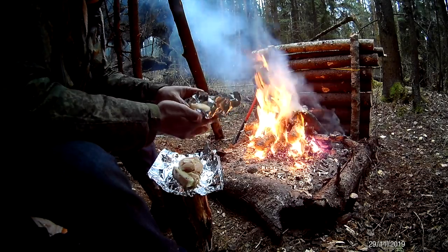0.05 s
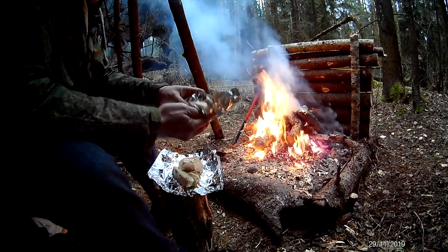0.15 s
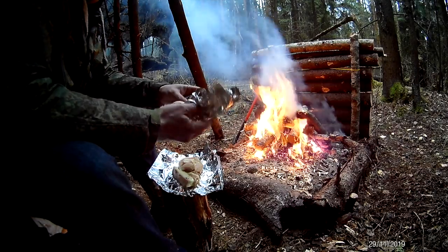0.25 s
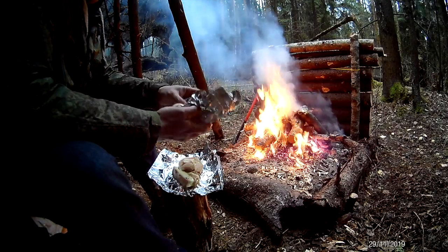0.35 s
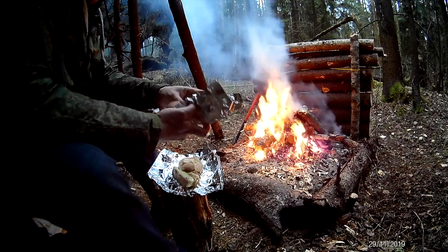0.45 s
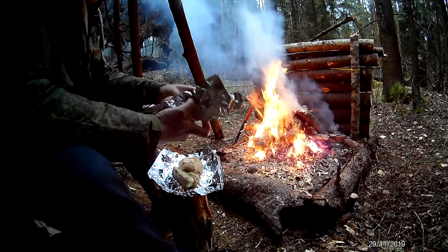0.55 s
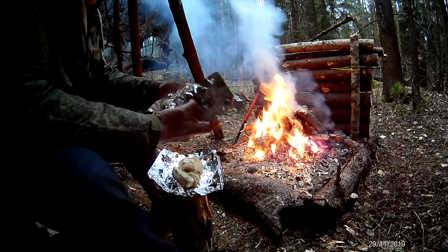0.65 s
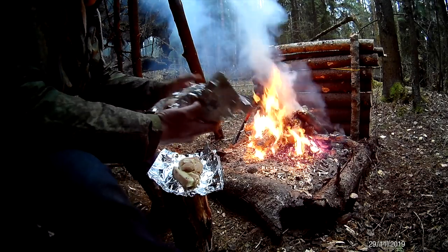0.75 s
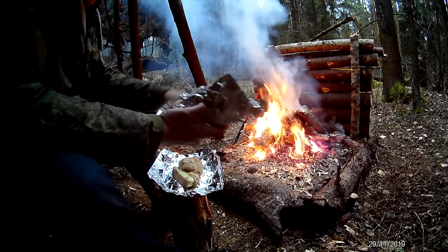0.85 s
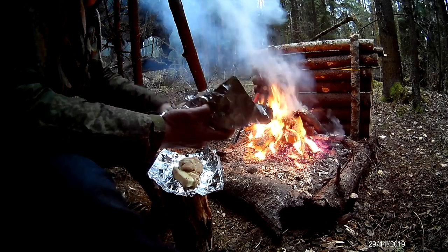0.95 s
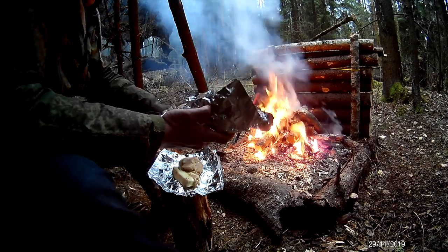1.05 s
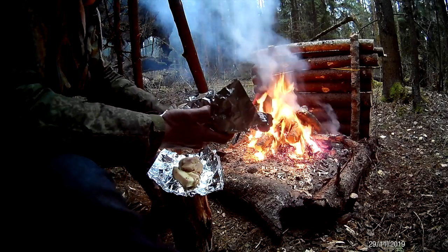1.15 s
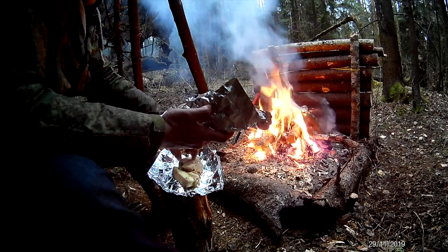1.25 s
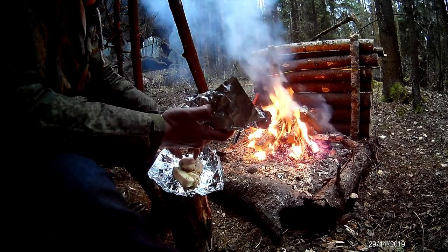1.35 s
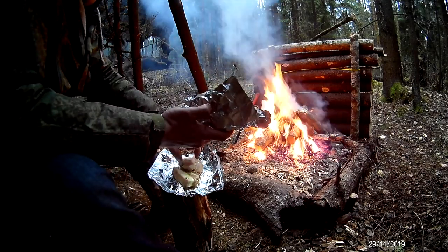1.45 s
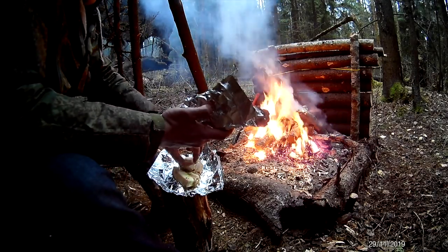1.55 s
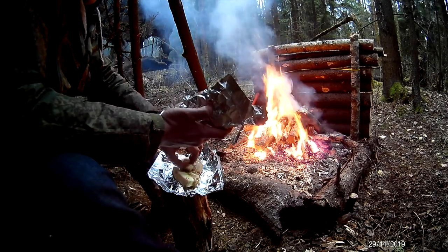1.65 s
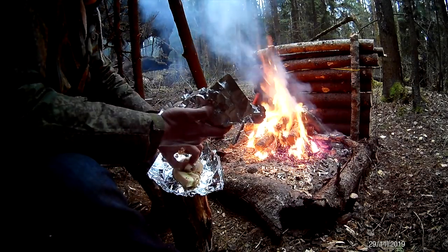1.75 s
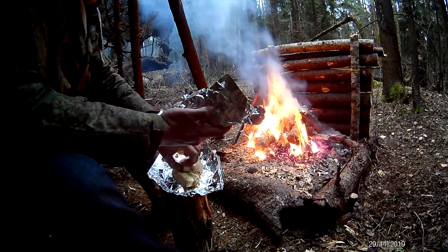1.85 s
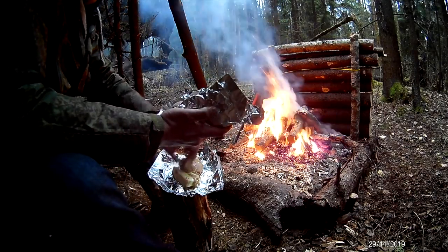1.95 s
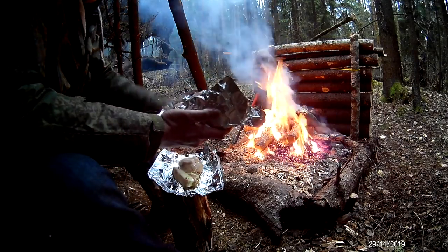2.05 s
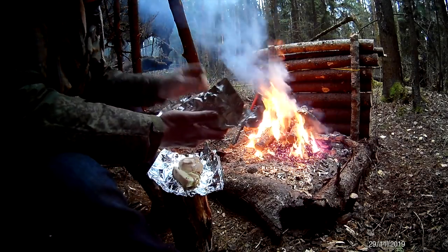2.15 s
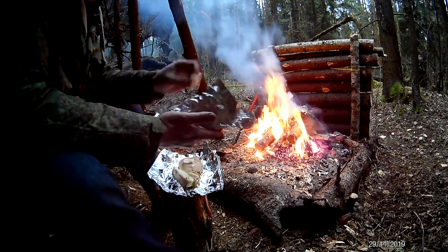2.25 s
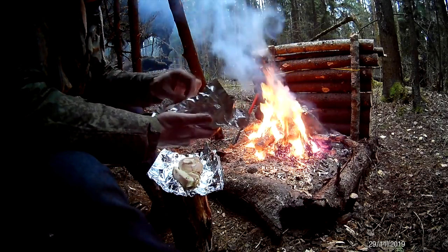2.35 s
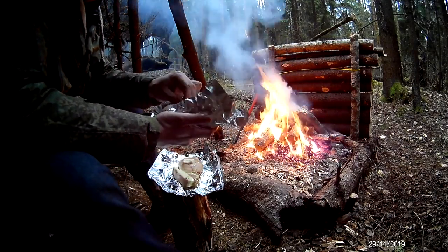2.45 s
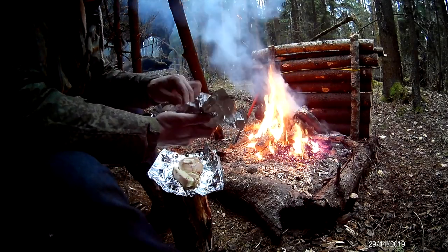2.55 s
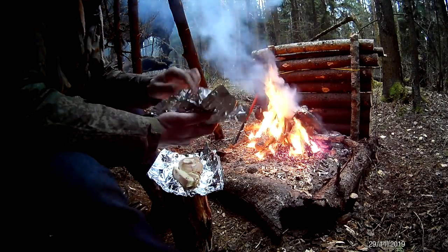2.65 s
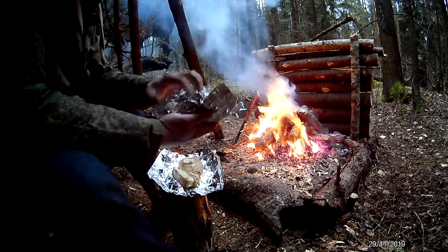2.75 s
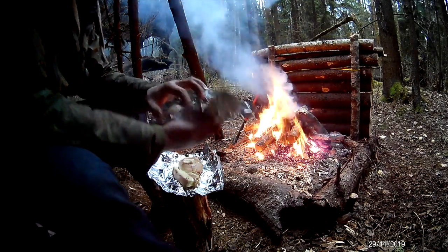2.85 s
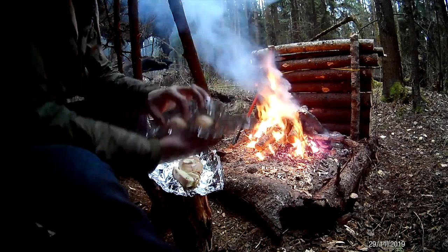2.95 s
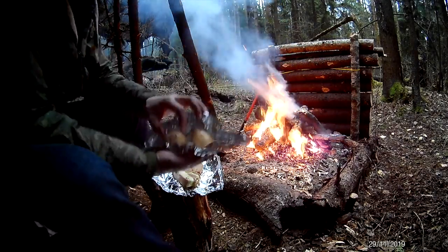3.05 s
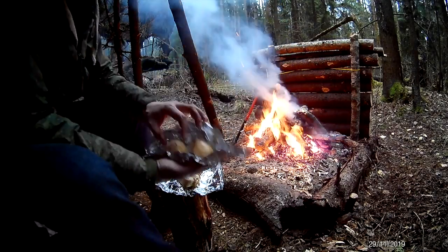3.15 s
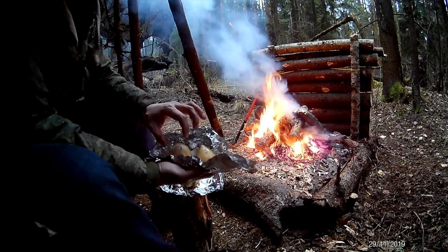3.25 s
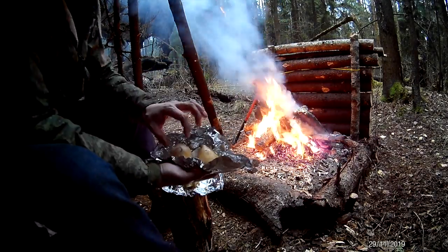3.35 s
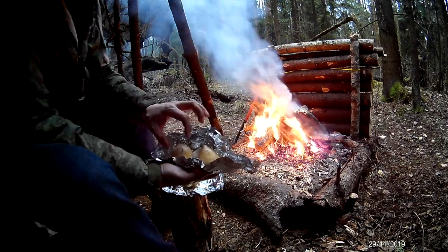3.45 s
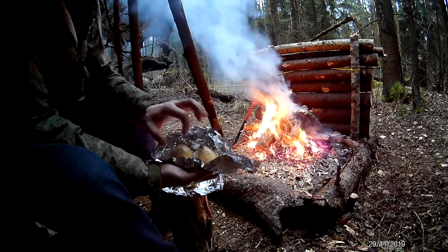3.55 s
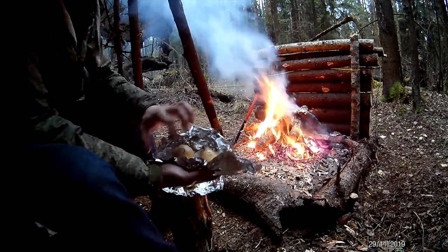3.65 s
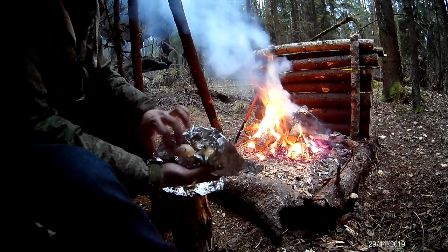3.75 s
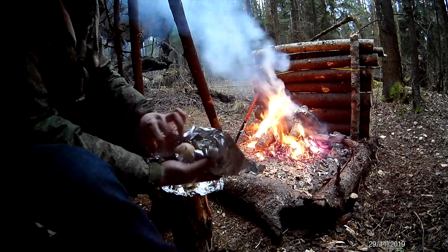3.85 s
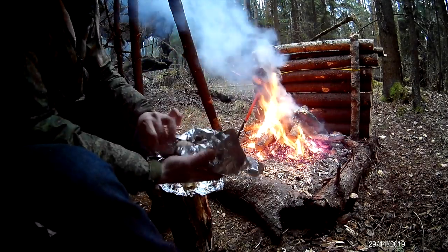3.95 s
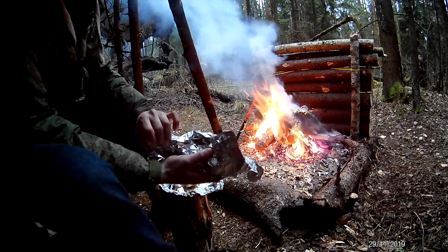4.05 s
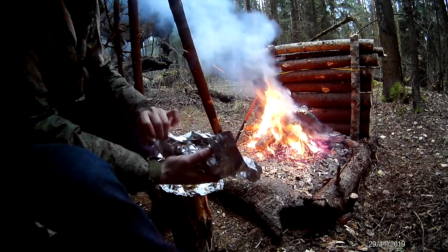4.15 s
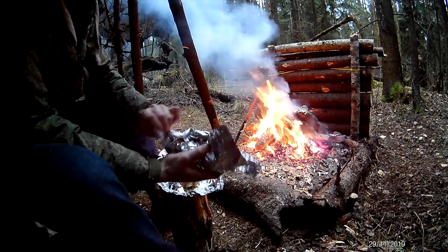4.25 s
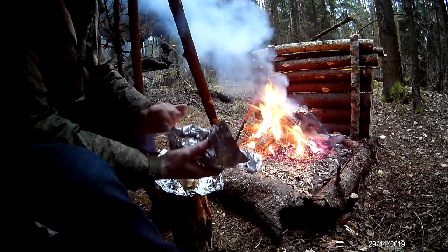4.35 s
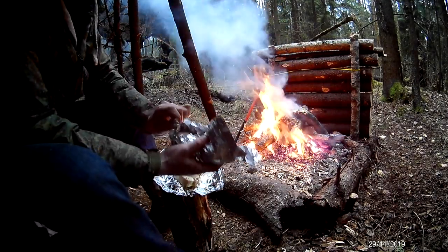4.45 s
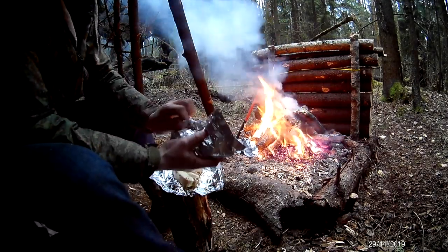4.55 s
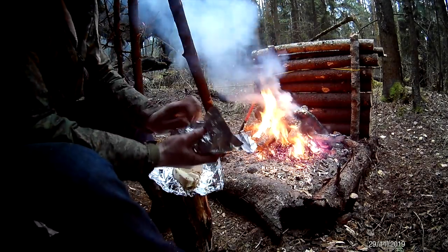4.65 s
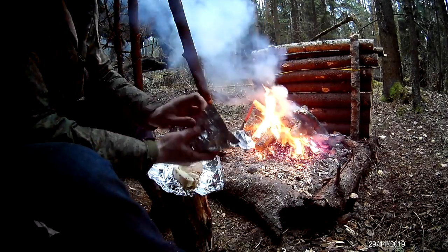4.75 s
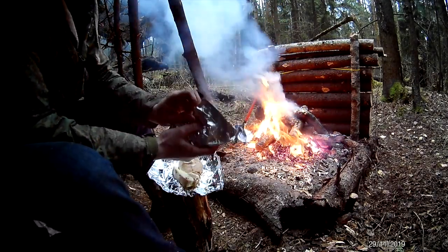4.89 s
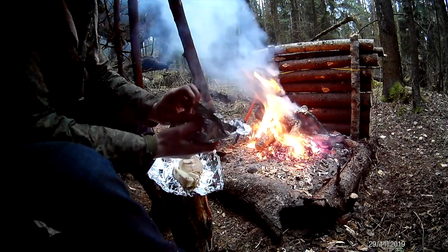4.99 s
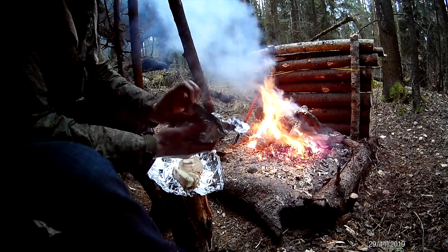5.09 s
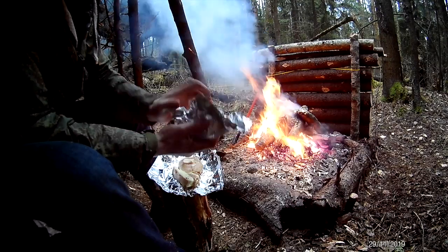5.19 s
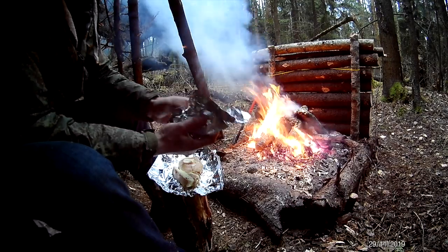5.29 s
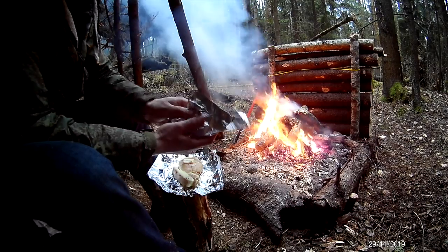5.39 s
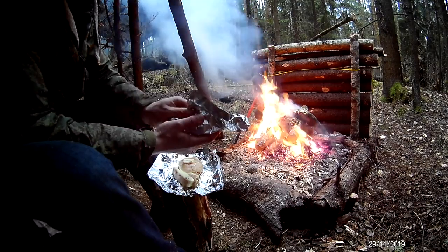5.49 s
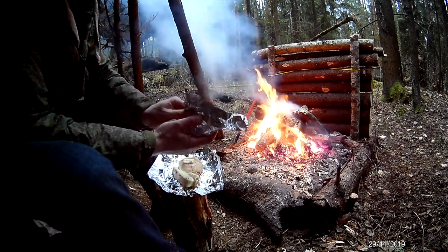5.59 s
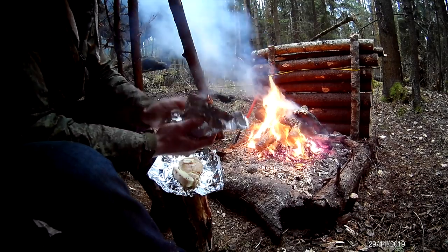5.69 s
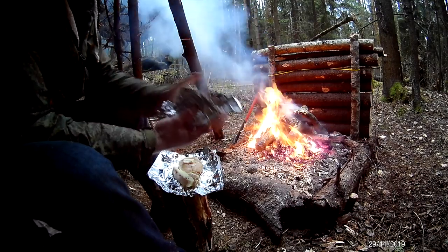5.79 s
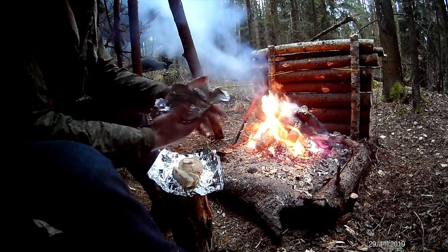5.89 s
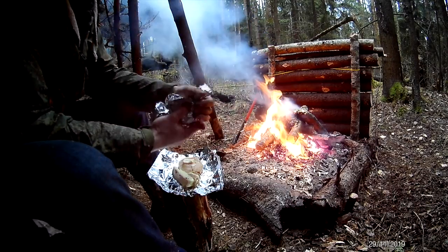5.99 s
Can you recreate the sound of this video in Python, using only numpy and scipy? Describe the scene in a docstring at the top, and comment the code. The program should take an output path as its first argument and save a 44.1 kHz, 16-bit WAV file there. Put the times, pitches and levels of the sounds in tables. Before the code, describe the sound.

Hands crumple an aluminium foil parcel close to a small camera by a forest campfire. Short crinkles and snaps come first, then a lull with two small sap pops. Squeezing resumes sparsely, then turns into dense, louder crackle with hollow little thumps. A low, soft fire roar flutters underneath, with faint hiss. The sound is boxy and slightly muffled by the camera housing.

```python
"""Hands crumple an aluminium foil parcel by a forest campfire, heard by a small camera through its housing.
0-1 s: squeezes; facets buckle in snaps over a swarm of ringing creases. 1-2.4 s: lull, two sap pops.
2.4-3.9 s: squeezes resume, scattered snaps. 3.9-6 s: dense snaps, ticks and crackle.
Throughout: filtered-noise fire roar with random flutter, faint idle crackle, filtered-noise hiss."""
import sys
import numpy as np
from scipy.fft import rfft, irfft, next_fast_len
from scipy.io import wavfile
from scipy.ndimage import map_coordinates

SR = 44100
rng = np.random.default_rng(int(sys.argv[2]) if len(sys.argv) > 2 else 0)


def transcribe(signal):
    """Save signal, clipped to [-1, 1], as a 16-bit WAV file at the path in sys.argv[1]."""
    frames = np.atleast_2d(signal).T
    limited = np.clip(frames, -1, 1)
    pcm = np.round(limited * 32767).astype(np.int16)
    wavfile.write(sys.argv[1], SR, pcm)


N = 265614

# Buckling facets: t/s, relative level/dB, facet pitch f/Hz, relative thump/dB, relative rattle/dB
FACET_SNAPS = [(0.081, -33, 3070, -31, -14.5), (0.148, -38.5, 4180, -21, -16),
               (0.152, -36.5, 3030, -22, -20), (0.305, -45, 1280, -15, -8), (0.3312, -45.5, 4040, -1.5, -8),
               (0.442, -40, 4080, -15, -13), (0.4695, -32.5, 1810, -4, -17), (0.6218, -41, 1616, -36, -23),
               (0.628, -39, 4840, -34, -25), (0.6527, -28.5, 4020, -41, -24), (0.663, -27, 4080, -25, -16),
               (0.6669, -32.5, 1040, 0, -17), (0.6755, -30, 2060, -0.5, -16), (0.678, -30.5, 666, -8, -31),
               (0.6832, -28.5, 4230, -32, -15.5), (0.7283, -38, 2310, -20, -14),
               (0.74, -29.5, 1670, -20, -16), (1.054, -44, 4146, -21, -9.5), (1.856, -49.5, 2430, -29, -14),
               (2.428, -47, 1710, -26, -19), (2.4646, -42, 1320, 3, -31), (2.611, -40.5, 1340, -8, -19),
               (2.7701, -46, 1300, 13, -4.5), (2.7929, -35, 1720, -5.5, -15), (3.0863, -38, 1510, 4, -16),
               (3.2503, -29.5, 2173, -23, -16), (3.546, -44.5, 2050, -26, -23),
               (3.6388, -42.5, 2150, -16, -9.5), (3.9, -39, 1130, -5, -14), (3.936, -35.5, 1020, -6, -18.5),
               (3.9755, -35.5, 1420, -4, -26), (3.9993, -33.5, 1930, -2, -17),
               (4.055, -26.5, 2010, -17, -19), (4.0792, -27.5, 1490, 4, -20.5),
               (4.0973, -33, 1820, -7, -22), (4.144, -28, 2250, -12, -22), (4.1518, -31, 1200, -1.5, -11.5),
               (4.1704, -38, 1290, 8, -25), (4.1919, -31.5, 700, 3.5, -12), (4.2057, -28, 710, -3, -14.5),
               (4.2155, -28.5, 550, -10, -20), (4.2358, -38, 2200, -16, -11), (4.257, -29.5, 2350, -1, -14),
               (4.275, -33, 1820, 5, -37), (4.2916, -33, 1250, -1, -13), (4.3073, -33, 1410, 4, -23),
               (4.319, -26, 2120, -6, -28), (4.3354, -45, 1440, -6, -2), (4.3568, -47, 1610, 10, -24),
               (4.51, -30.5, 2150, -11, -11.5), (4.5158, -31.5, 1340, -2.5, -16),
               (4.5755, -27, 1560, -16, -22), (4.5867, -25, 1510, -5.5, -30),
               (4.6082, -29.5, 1315, -2, -26), (4.6487, -39.5, 2100, 0.5, -3.5),
               (4.7163, -36.5, 1630, 2.5, -9.5), (4.7593, -42, 2140, -21.5, -3.5),
               (4.779, -28, 4150, -14, -31), (4.792, -31, 1390, -12, -16.5), (4.806, -34, 1100, -14, -22),
               (4.8276, -35, 1310, -2, -30), (4.844, -29, 2110, -7, -25), (4.852, -38.5, 1090, 3.5, -7.5),
               (4.9012, -34, 1800, -19, -34), (5.045, -42, 1340, 8.5, -7), (5.047, -27.5, 4710, -21, -36),
               (5.1118, -29.5, 1055, -5.5, -17.5), (5.1703, -34, 1570, -5, -24),
               (5.1855, -30.5, 1260, 7.5, -8.5), (5.19, -31.5, 1310, 0, -18),
               (5.1945, -30, 1670, -4, -13.5), (5.203, -28.5, 2010, -16, -17),
               (5.3691, -36, 1750, -3, -22.5), (5.4049, -30, 1920, 1, -14), (5.453, -39, 1020, 3, -21),
               (5.4867, -29.5, 1910, 2.5, -13.5), (5.5068, -22.5, 2080, 2.5, -22),
               (5.511, -31, 1300, -4, -13), (5.7279, -34.5, 1785, -4, -17), (5.7536, -32, 2050, -7, -14),
               (5.7882, -36.5, 1530, -19, -15), (6.0054, -27, 1770, -1.5, -19.5)]
# Squeezes of the hands: start t/s, hold/s, crackle level before housing/dB,
# tilt toward small bright facets/(dB per octave)
HAND_SQUEEZES = [(0.0, 0.078, -44.5, -1.5), (0.152, 0.033, -46, -3), (0.264, 0.066, -51.5, 2),
                 (0.378, 0.15, -44.5, -2), (0.631, 0.065, -41, -2), (0.745, 0.028, -42, -1),
                 (0.939, 0.019, -47.5, -2), (2.44, 0.047, -56, -3), (2.565, 0.074, -48, -5.5),
                 (2.692, .12, -45, -2), (2.855, 0.26, -43, -4), (3.787, 0.0068, -49.5, -1),
                 (3.835, 0.01, -45, 1), (3.903, 0.096, -47, -2.5), (4.027, 0.065, -34.5, -1),
                 (4.14, 0.06, -36, -1.5), (4.281, 0.088, -39.5, -1), (4.438, 0.085, -42.5, 0),
                 (4.561, 0.083, -37, -0.5), (4.713, 0.035, -38, 0.5), (4.828, 0.076, -38, -1.5),
                 (4.937, 0.094, -45.5, -2), (5.014, .11, -40.5, -1.5), (5.173, 0.043, -36.5, 1.5),
                 (5.284, 0.038, -42, 0), (5.368, 0.073, -38.5, -1.5), (5.475, 0.1, -40, -3.5),
                 (5.558, 0.057, -42.5, 2), (5.703, 0.055, -39, -1), (5.833, 0.08, -45.5, -1),
                 (5.976, .06, -40, -1)]
# Tiny folds ticking: t/s, relative level/dB
FOLD_TICKS = [(0.277, -38), (0.8043, -45), (2.6224, -45), (2.9575, -43), (3.01, -45), (3.1083, -41),
              (3.229, -45), (3.901, -37), (4.0406, -35.5), (4.135, -33), (4.427, -35), (4.4544, -36.5),
              (4.6244, -47), (4.691, -41), (5.3733, -41), (5.6161, -45), (5.6544, -36.5), (5.7174, -54)]
# Sap pockets bursting: t/s, relative level/dB
SAP_POPS = [(1.6393, -30), (1.7254, -40.5)]
# Sound path into the camera: f/Hz, gain/dB
HOUSING_GAIN = [(130, -33), (250, -7.5), (450, -6), (823, -3.5), (2090, -6), (2320, -6.5), (2850, -22.5),
                (3520, -19), (4080, -13), (4500, -17), (5500, -22), (6210, -19.5), (7500, -40), (8000, -48),
                (8550, -29.5), (9150, -27.5), (10500, -31.5), (12400, -30), (13200, -40), (15500, -41)]
# Flame roar spectrum shape: f/Hz, relative level/dB
ROAR_SHAPE = [(12, -19), (22, -6), (50, 2.5), (85, -3), (147, -4), (242, -13.5), (420, -13), (484, -12),
              (915, -12.5), (1330, -14.5), (1560, -28.5), (2300, -36), (2900, -64), (6000, -100)]
# Microphone self-noise spectrum shape: f/Hz, relative level/dB
HISS_SHAPE = [(500, 12), (3000, 3.5), (7500, -3.5), (12000, -4.5), (15800, -1)]

SWELL_AT_0DB_THUMP_S, DAMPING_DB_PER_DB = 0.00099, 0.44  # louder thump: shorter facet ring
PUSH_S = 0.001284  # push centre, after the ring starts
PARCEL_HZ, TIGHTER_HZ_PER_S = 300.4, 33.55  # thump pitch rises as the parcel is crumpled smaller
ATTACK_S, RELEASE_DB_PER_S = 0.015, 252  # squeeze: fast swell, slower relaxation
IDLE_DB, IDLE_TILT_DB_PER_OCT = -61.5, -0.31  # foil merely held
ROAR_RMS_DB, HISS_RMS_DB = -53, -72
TOP_HZ = 15780


def amp(db):
    """dB to gain."""
    return 10 ** (np.asarray(db) / 20)


def unit(x):
    """Scaled to rms 1."""
    return x / np.sqrt(np.mean(x ** 2) + 1e-20)


def wobble(knots_per_s):
    """Smooth random curve through normal knots."""
    knots = rng.standard_normal(int(N * knots_per_s / SR) + 4)
    return map_coordinates(knots, [np.arange(N) * knots_per_s / SR])


def coloured(x, points):
    """x through the causal minimum-phase filter with these (Hz, dB) gains."""
    m = 2 * next_fast_len(N // 2 + 4096)
    f_hz, gain_db = np.transpose(points)
    bins_hz = np.fft.rfftfreq(m, 1 / SR)
    log_gain = np.interp(np.log(bins_hz + 1), np.log(f_hz + 1), gain_db) * np.log(10) / 20
    cepstrum = irfft(log_gain, m)
    # fold onto positive times: minimum phase
    cepstrum[1:m // 2] *= 2
    cepstrum[m // 2 + 1:] = 0
    return irfft(rfft(x, m) * np.exp(rfft(cepstrum)), m)[:N]


def mix(starts, shapes):
    """Sum of short sounds (rows of shapes) beginning at the given samples."""
    where = starts[:, None] + np.arange(shapes.shape[1])
    return np.bincount(where.ravel(), shapes.ravel(), N + shapes.shape[1])[:N]


def facet_ring(t, start_s, hz, thump_db, rattle_db, drift):
    """A buckling facet swells and dies; its overtones go with the rattle."""
    phase = 2 * np.pi * hz * (t - PUSH_S) + drift
    overtones = np.cos(2 * phase) + np.cos(3 * phase)
    tone = np.cos(phase) + amp(rattle_db + 8.5) * overtones
    age = t / (SWELL_AT_0DB_THUMP_S * amp(-DAMPING_DB_PER_DB * thump_db))
    return -.8 * tone * age * np.exp(1 - age)


def parcel_thump(t, start_s, hz, thump_db, rattle_db, drift):
    """The facet's push as a short pulse, plus the whole parcel's decaying low ring."""
    u = (np.pi * .7 * hz * (t - PUSH_S)) ** 2
    push = 2.61 * (2 * u - 1) * np.exp(-u)
    parcel_hz = PARCEL_HZ + TIGHTER_HZ_PER_S * start_s
    body = 0.99 * amp(-60 * t / 0.064) * np.sin(2 * np.pi * parcel_hz * t + 0.53 * drift)
    return amp(thump_db - 6.5) * (push + body)


def facet_rattle(t, start_s, hz, thump_db, rattle_db, drift):
    """Neighbouring small facets: uneven noise and seven random pitches per snap, swelling then dying."""
    small_hz = 2600 * 4.8 ** rng.random((len(start_s), 7))
    chime = sum(np.sqrt(f / 4000) * np.sin(2 * np.pi * f * t + 0.38 * drift)
                for f in small_hz.T[..., None])
    chance = rng.standard_normal((2, len(start_s), len(t)))
    noise = chance[0] * np.exp(0.81 * chance[1])
    t60_s = 0.043 * amp(0.21 * (rattle_db + 11.5))  # weak rattle is also brief
    decay = amp(rattle_db + 13.5 - 60 * t / t60_s)
    return decay * (noise + 0.61 * chime) * (1 - np.exp(-t / 0.0012))


def snaps():
    """Each buckle sums facet ring, parcel thump and rattle, all sharing one phase drift."""
    start_s, db, hz, thump_db, rattle_db = (c[:, None] for c in np.transpose(FACET_SNAPS))
    t = np.arange(SR // 16) / SR
    # phase wanders as the facet changes shape
    drift = np.cumsum(rng.standard_normal((len(start_s), len(t))), 1) * 0.16
    drift = drift - drift[:, [round(PUSH_S * SR)]]  # ring and push dip together
    snap = (t, start_s, hz, thump_db, rattle_db, drift)
    shapes = facet_ring(*snap) + parcel_thump(*snap) + facet_rattle(*snap)
    return mix((start_s[:, 0] * SR).astype(int), amp(db - 2.0) * shapes)


def creases(count=34000):
    """Swarm of tiny creases, each ringing one facet for a few cycles; hard squeezes are more uneven."""
    control_s, gain, tilt = handling()
    draw = rng.random((count, 4))
    start = (draw[:, 0] * N).astype(int)
    octave = -2.4 + 5.2 * draw[:, 1:2]  # re 2 kHz
    hz = 2000 * 2 ** octave
    t = np.arange(SR // 170) / SR
    # hard squeeze: uneven clumps; gentle: even rustle
    force = np.interp(start / SR, control_s, np.sqrt(gain / amp(-37.5)))[:, None]
    spread_db = -4.2 * np.log(draw[:, 2:3] + 0.04) + 3.1 * wobble(90)[start, None]
    size = amp(np.clip(force, .4, .9) * spread_db - 3.1 * force)
    tilt_db_per_oct = np.clip(np.interp(start / SR, control_s, tilt), -5, 5)[:, None]
    lean = amp(tilt_db_per_oct * octave)
    # the changing patch under the fingers favours some facet sizes
    lean *= amp(2.0 * np.cos(2 * np.pi * (octave + wobble(25)[start, None])))
    cycles = .5 + 16 * draw[:, 3:] ** 2
    fade = np.exp(-hz * t / cycles) * (1 - t / t[-1]) / np.sqrt(cycles)
    # factor hz: small facets move faster and radiate more
    shapes = -size * lean * hz * np.sin(2 * np.pi * hz * t) * fade
    return np.interp(np.arange(N) / SR, control_s, gain) * unit(mix(start, shapes))


def handling():
    """Crackle gain and tilt in time: squeezes add in power, which also weights their tilts."""
    start_s, hold_s, db, tilt = (c[:, None] for c in np.transpose(HAND_SQUEEZES))
    t = np.arange(0, N / SR, .001)
    rise = np.clip((t - start_s) / ATTACK_S + 1, 0, 1)  # full at start_s
    release_db = RELEASE_DB_PER_S * np.clip(t - start_s - hold_s, 0, 1)
    power = (rise * amp(db - release_db)) ** 2
    idle = amp(IDLE_DB) ** 2
    total = power.sum(0) + idle
    mean_tilt = ((power * tilt).sum(0) + idle * IDLE_TILT_DB_PER_OCT) / total
    return t, np.sqrt(total), mean_tilt


def ticks():
    """Tiny folds: decaying, treble-heavy differenced noise, a few milliseconds of fizz."""
    start_s, db = np.transpose(FOLD_TICKS)
    t = np.arange(SR // 50) / SR
    fizz = np.diff(rng.standard_normal((len(start_s), len(t) + 1))) * amp(-60 * t / 0.016)
    return mix((start_s * SR).astype(int), amp(db[:, None] + 12.5) * fizz)


def pops():
    """Sap bursts: a sharp pressure step, then noise scatter from the ground and log wall."""
    start_s, db = np.transpose(SAP_POPS)
    t = np.arange(SR // 20) / SR
    noise = rng.standard_normal((len(start_s), len(t)))
    scatter = 0.21 * noise * amp(-60 * t / 0.033) * (t > .003)
    step = -np.exp(-t / .00005)
    return mix((start_s * SR).astype(int), amp(db[:, None] + 16) * (scatter + step))


def fire():
    """Flame roar: filtered noise fluttering at two speeds."""
    flutter = amp(0.51 * wobble(6.8) + 0.92 * wobble(25))
    return amp(ROAR_RMS_DB) * unit(coloured(flutter * rng.standard_normal(N), ROAR_SHAPE))


def hiss():
    """Microphone self-noise: steady filtered noise."""
    return amp(HISS_RMS_DB) * unit(coloured(rng.standard_normal(N), HISS_SHAPE))


def scene():
    """Foil and pops pass the housing filter; the roar spectrum is already as heard."""
    through_housing = coloured(snaps() + creases() + ticks() + pops(), HOUSING_GAIN)
    return (through_housing + fire())[None]


def record(dry):
    """Adds self-noise, then removes everything from the band limit up."""
    wet = dry + hiss()
    m = next_fast_len(N + 8192)
    passband = np.fft.rfftfreq(m, 1 / SR) < TOP_HZ
    return irfft(rfft(wet, m) * passband, m)[:, :N]


dry = scene()
out = record(dry)
transcribe(out)
```